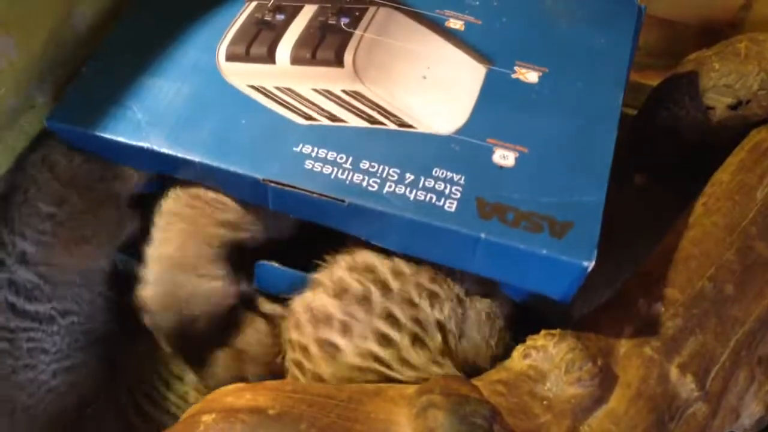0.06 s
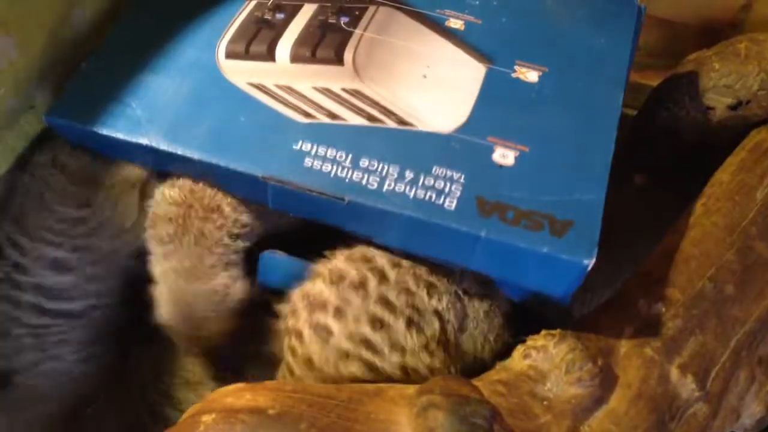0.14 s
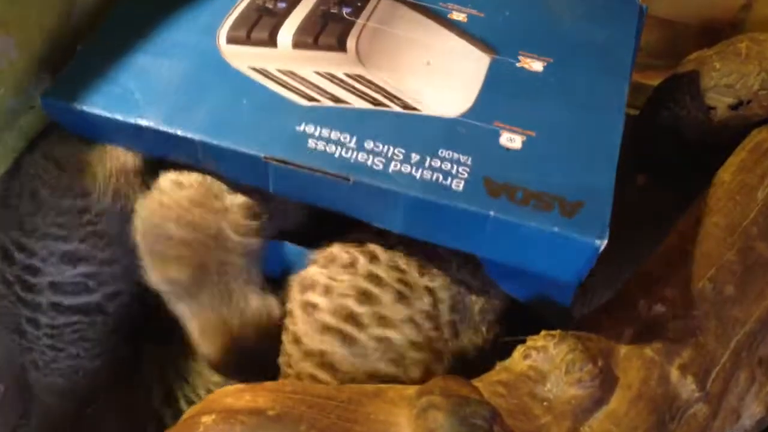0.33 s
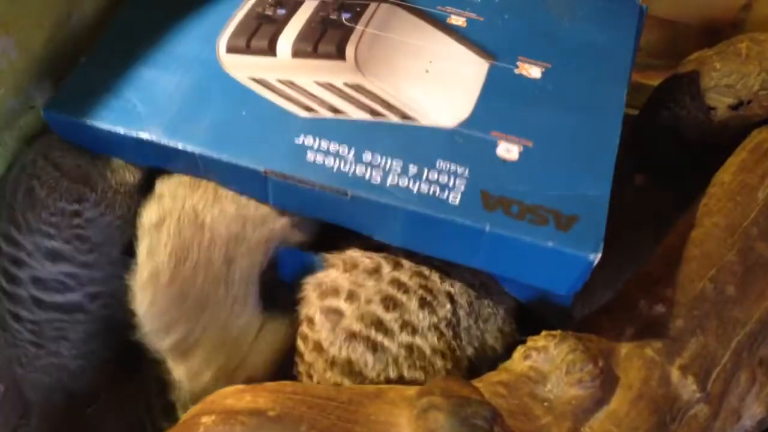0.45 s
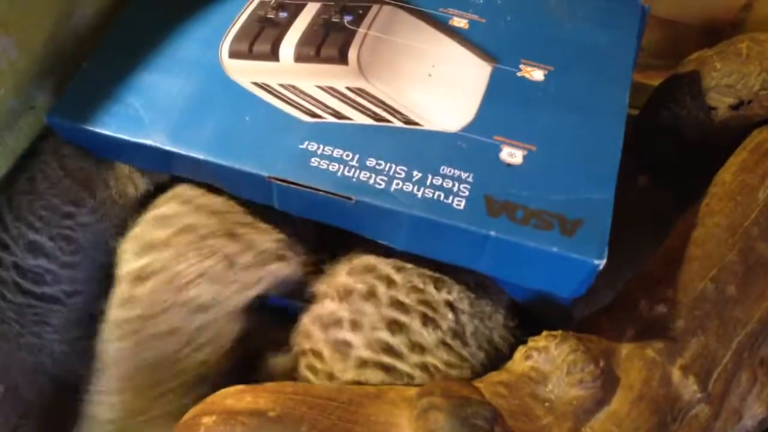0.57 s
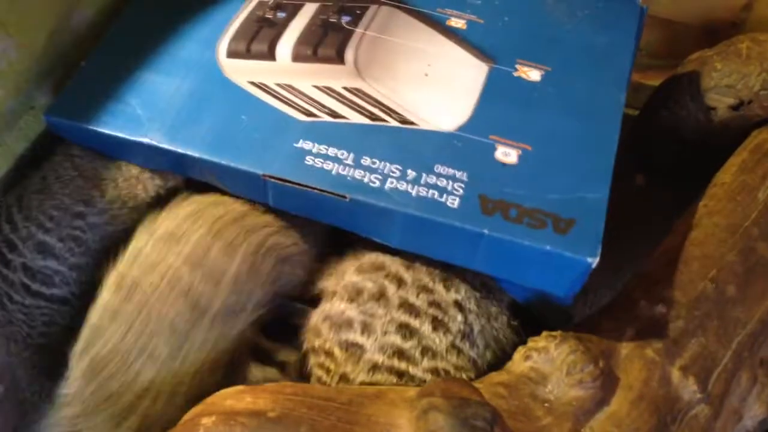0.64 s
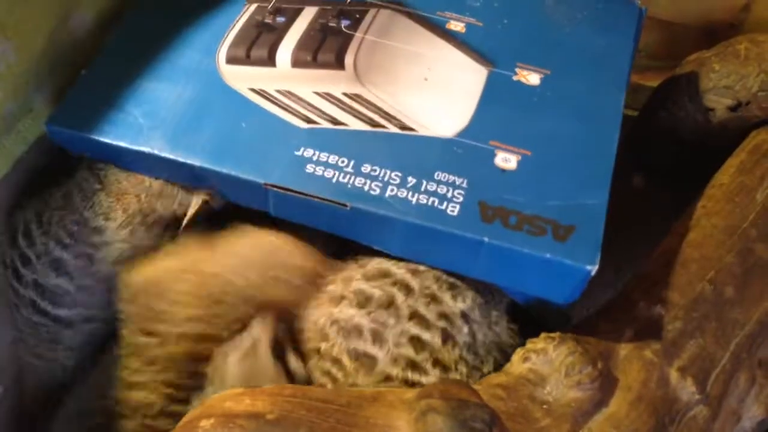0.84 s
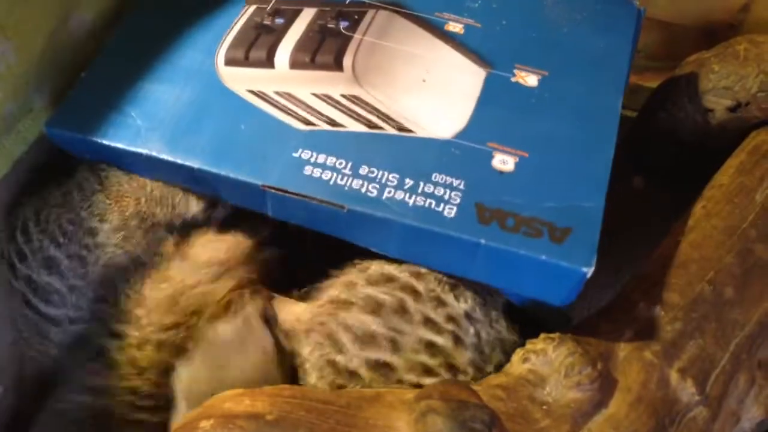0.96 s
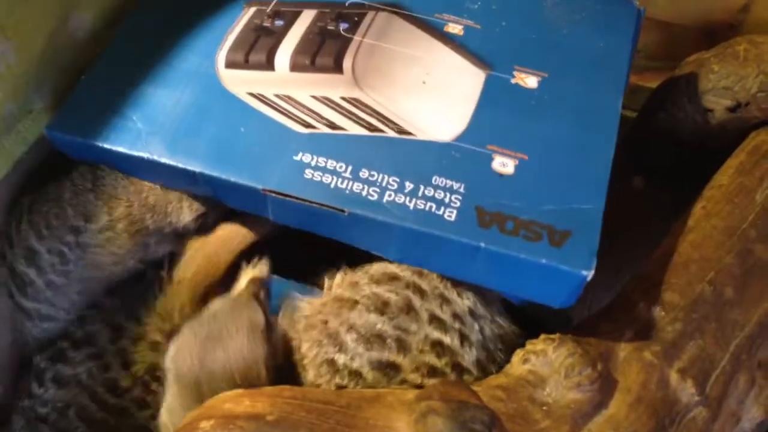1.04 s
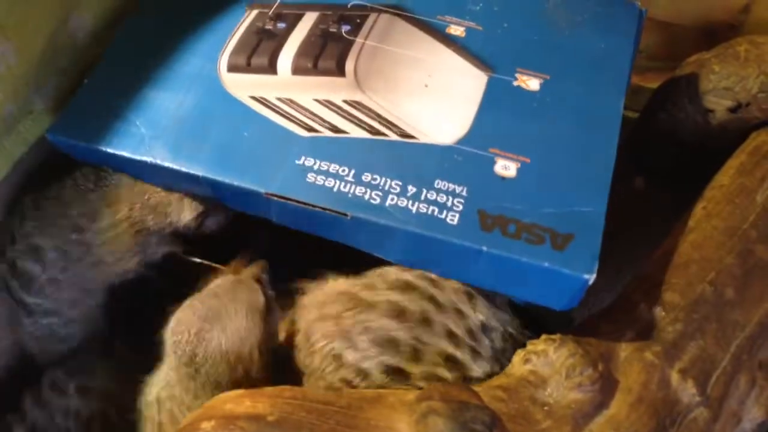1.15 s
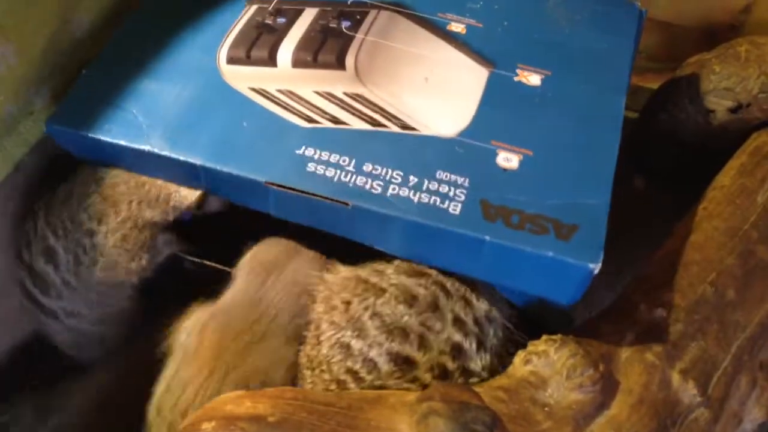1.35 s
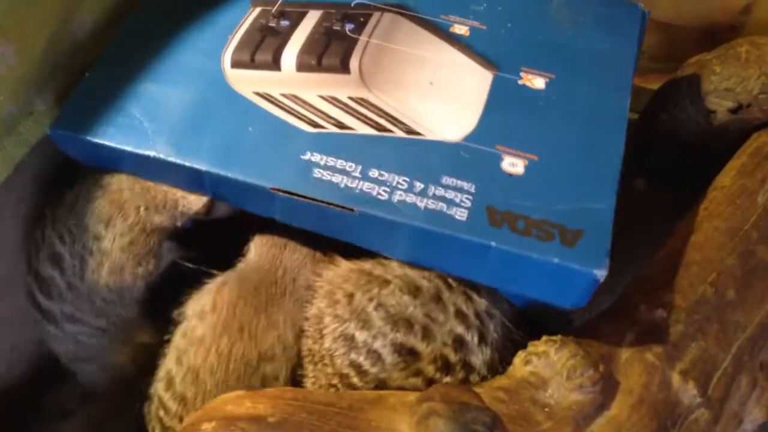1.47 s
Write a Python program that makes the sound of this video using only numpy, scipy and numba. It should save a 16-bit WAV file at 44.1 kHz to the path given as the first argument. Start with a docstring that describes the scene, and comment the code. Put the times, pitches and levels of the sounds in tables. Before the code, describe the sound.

A meerkat chatters in short harsh barks, starting faintly, loudest in a rapid run from about 0.2 to 0.5 seconds, then fading by 0.9, with faint single calls near 1.1 and 1.4. Paws thump a hollow cardboard box from 0.2 seconds, busiest around 1.2, with light claw scrapes and soft shuffling. A small enclosure adds a short echo over a quiet hush.

```python
"""In a small hard enclosure, a meerkat chatters beside a cardboard box. Its short harsh barks,
up to about twelve a second, grow louder and die away: uneven throat pulses and rasp ring its mouth.
Paws thump the hollow box, claws scrape the card, and fur and paws shuffle against it.
The walls add a short echo to the barks and scrapes, over a soft room hush."""
import sys
import numpy as np
from scipy import signal
from scipy.io import wavfile
from scipy.ndimage import uniform_filter1d
from numba import njit

SR = 44100
rng = np.random.default_rng(int(sys.argv[2]) if len(sys.argv) > 2 else 0)


def generate_wav(signal):
    """Clip the signal to [-1, 1] and save it as 16-bit WAV at the path in sys.argv[1]."""
    frames = np.transpose(np.atleast_2d(signal))
    scaled = np.clip(frames, -1, 1) * 32767
    pcm = np.round(scaled).astype(np.int16)
    wavfile.write(sys.argv[1], SR, pcm)


N = 66150

# The barks. Each row: start, swell and hold in seconds; overall, low-ring and teeth gains in dB;
# main and upper mouth resonances in Hz; upper resonance gain in dB; pitch in Hz.
BARK_CALLS = [(.004, 0.011, 0.022, -42, 1, -8.5, 2480, 3600, -17, 415.2),
              (0.158, 0.015, 0.025, -34.5, 0.5, -9, 2400, 3640, -9, 415),
              (0.236, .022, 0.0054, -13, -8.5, -1.5, 2353, 3730, -1, 622.2),
              (.312, 0.011, 0.015, -13.5, -16, 3, 2430, 3494, 1, 625.9),
              (0.387, .018, 0.01, -12, -16, 5, 2605, 3495, -4, 622.2),
              (0.47, .022, 0.0059, -14.5, -12, 3, 2376, 3540, -2.5, 617.5),
              (.570, 0.011, 0.0081, -24.5, -6.5, 1.5, 2411, 3046, 5, 477.7),
              (0.654, .02, 0.017, -37.5, 10, -2.5, 2836, 3270, 1, 405),
              (.746, 0.011, 0.013, -31, 0.5, -25, 2550, 3406, -32, 386.8),
              (0.84, 0.018, 0.016, -41, 2, -29, 1940, 2550, -4.5, 395.5),
              (1.057, 0.005, 0.018, -42, 0.5, -18, 2063, 3560, -13, 646),
              (1.44, 0.0088, 0.011, -39, -10, -18, 1960, 2520, -4.5, 505)]
# Where throat and teeth ring. Each row: centre in Hz, width in Hz, gain in dB.
THROAT_RINGS = [(1460, 410, -36), (1687, 213, -7.5), (2250, 100, -7.5), (3120, 480, -12), (4360, 640, -23)]
TEETH_RINGS = [(5400, 1100, -12.5), (5970, 1310, -7), (6850, 370, -13.5), (7430, 780, -15.5),
               (9200, 2500, -22.5)]
# Low resonances of the barks, including a lingering enclosure ring near 840 Hz.
# Each row: centre in Hz, width in Hz, gain in dB.
LOW_RINGS = [(837, 44, -7), (971, 135, -2), (1065, 530, -4.5)]
# Paws landing. Each row: start in seconds, level in dB, contact time in ms, focus in Hz, cut in dB
# per octave away from that focus (negative boosts), fade time of the scuffle in seconds.
PAW_THUMPS = [(0.21, -12, 3.5, 160, -8, 0.011), (0.29, -32, 6.1, 150, 5, 0.02),
              (0.354, -31, 1.6, 170, 19, .012), (0.369, -21.5, 3.2, 120, -2.5, 0.0099),
              (0.647, -21.5, 3.25, 202, -2, 0.037), (0.774, -24, 1.02, 231, -1, 0.016),
              (.886, -23, 1.38, 190, 2, 0.0054), (.912, -17.5, 0.89, 226, 3, 0.018),
              (0.967, -27.5, 4.2, 147, -5, 0.0059), (0.996, -25, 6.3, 150, -7, 0.007),
              (1.06, -29.5, 0.58, 650, 39, 0.0027), (1.093, -29.5, .8, 620, 32, 0.0047),
              (1.116, -22, 0.81, 400, 10, 0.03), (1.174, -21, 1.2, 200, -3, 0.006),
              (1.187, -8, 0.85, 238, 3, 0.011), (1.211, -16, 0.77, 445, 13, 0.021),
              (1.327, -17, 0.45, 297.5, -5.5, .008), (1.347, -20, 0.71, 416, 20, 0.011),
              (1.420, -34.5, 0.62, 620, 31, 0.0035), (1.454, -18, 0.84, 462.5, -1.5, 0.014),
              (1.472, -25, 3, 120, 25, 0.0067)]
# The box's own tones. Each row: frequency in Hz, gain in dB, seconds to fade by 60 dB.
BOX_TONES = [(107.6, -12.5, 0.27), (146, -10, 0.13), (197.3, -2.5, 0.16), (218.5, -0.5, 0.157),
             (286, -8.5, 0.065), (382, -3.5, 0.099), (440, -2, 0.076), (519, -0.5, 0.04),
             (603.4, -5.5, 0.094), (690, -0.5, 0.026), (848, -8.5, 0.052), (995, -5, 0.036),
             (1330, -2.5, 0.029), (1900, -45, 0.021)]
# Claws on card. Each row: start in seconds, length in seconds, level in dB, centre in Hz.
CLAW_SCRAPES = [(0.303, 0.0071, -34, 13000), (0.724, 0.0089, -45.5, 7000), (0.79, 0.041, -51, 10700),
                (.866, 0.0081, -54, 5870), (0.954, 0.029, -52, 8500), (1.113, 0.0071, -49, 6000),
                (1.179, 0.091, -44.5, 6440), (1.179, 0.031, -34, 2030), (1.189, 0.032, -43, 1210),
                (1.222, 0.027, -39, 9000), (1.232, 0.0089, -30.5, 6500), (1.449, 0.0064, -28, 8900),
                (1.451, 0.031, -40, 3340)]
# How strongly fur and paws rub the card. Each row: time in seconds, gain in dB.
SHUFFLE_CURVE = [(0, -41.5), (.07, -57.5), (.15, -50.5), (.3, -39), (.55, -46), (.63, -48), (.72, -43.5),
                 (.84, -46), (.93, -46.5), (.96, -64), (1.05, -68), (1.13, -53), (1.239, -40), (1.29, -84),
                 (1.4, -50), (1.458, -48)]
# The tone colour of the room hush. Each row: frequency in Hz, relative level in dB.
HUSH_COLOUR = [(15, -35), (25, 13), (246, 0), (495, 1), (945, -62), (1800, 1), (2120, -20.5), (2850, -17),
               (3530, -17), (15500, -22.5)]

PITCH_JITTER, PULSE_SCATTER_DB, RASP_DB, RELEASE_S = .035, 2.5, -1, .0056
MAIN_WIDTH_HZ, UPPER_WIDTH_HZ = 220, 420
TONE_SCATTER_DB, PHASE_SCATTER_RAD, SCUFFLE_DB = 2, .4, -23
ECHO_DB, ECHO_SPLIT_HZ, ECHO_RISE_S = -11, 1800, .0044
LOW_FADE_S, HIGH_FADE_S = .32, .11  # time for the echo to fall by 60 dB


def meerkat(t):
    """Pulses and rasp swell and fade with each bark, ringing mouth, throat, teeth and low resonances."""
    barks = np.array(BARK_CALLS)
    start, swell, hold = barks[:, :3].T[:, :, None]
    current = np.clip(np.searchsorted(barks[:, 0], t) - 1, 0, None)
    low_db, teeth_db, main_hz, upper_hz, upper_db, pitch_hz = barks[current, 4:].T
    source = throat_pulses(pitch_hz) + undb(RASP_DB) * rng.standard_normal(N)
    age = t - start
    rise = np.clip(age / swell, 0, 1) ** 2
    fall = np.exp(-np.maximum(age - swell - hold, 0) / RELEASE_S)
    loudness = undb(barks[:, 3]) @ (rise * fall)
    voice = source * loudness + 1e-18
    main = resonate(voice, [(main_hz, MAIN_WIDTH_HZ, 0)])
    upper = resonate(voice * undb(upper_db), [(upper_hz, UPPER_WIDTH_HZ, 0)])
    throat = resonate(voice, THROAT_RINGS)
    low = resonate(voice * undb(low_db), LOW_RINGS)
    teeth = resonate(voice * undb(teeth_db), TEETH_RINGS)
    return undb(-4.5) * (main - upper + throat + low + teeth)


def throat_pulses(pitch_hz):
    """The throat gives one pulse a cycle, uneven in timing and strength."""
    step = pitch_hz * (1 + PITCH_JITTER * wander(500)) / SR
    cycles = np.cumsum(step)
    at = np.flatnonzero(np.diff(np.floor(cycles[:-1]))) + 1
    share = cycles[at] % 1 / step[at]  # each pulse is split between two samples
    size = undb(PULSE_SCATTER_DB * rng.standard_normal(N)[at])
    pulses = np.zeros(N)
    pulses[at], pulses[at + 1] = size * share, size * (1 - share)
    return level(pulses, 0)


def resonate(voice, rings):
    """Each resonance picks out one band of the voice; the bands add with alternating signs."""
    return sum((-1) ** k * undb(db) * bandpass(band(voice, hz, width), hz + np.zeros(N), 2. * width)
               for k, (hz, width, db) in enumerate(rings))


def box_thumps():
    """A paw pushes the card, then scuffles; where it lands decides which box tones ring most."""
    out = np.zeros(N + SR)
    scatters = rng.standard_normal((len(PAW_THUMPS), len(BOX_TONES), 2))
    age = np.arange(SR // 3) / SR
    for (start, db, contact_ms, focus_hz, cut_db, scuffle_s), scatter in zip(PAW_THUMPS, scatters):
        ring = 0
        for (hz, tone_db, fade_s), (gain_draw, phase_draw) in zip(BOX_TONES, scatter):
            gain = undb(tone_db + TONE_SCATTER_DB * gain_draw - cut_db * abs(np.log2(hz / focus_hz)))
            tone = np.sin(2 * np.pi * hz * age + PHASE_SCATTER_RAD * phase_draw)
            ring += gain * tone * fade(age, fade_s)
        grit = rng.standard_normal(SR // 10) * undb(1.5 * rng.exponential(size=SR // 10))
        contacts = level(grit, SCUFFLE_DB) * np.exp(-age[:SR // 10] / scuffle_s)
        contacts[0] = 1  # the landing itself
        push = np.sin(np.pi * np.clip(age[:SR // 100] / contact_ms * 1000, 0, 1)) ** 2
        blow = np.convolve(ring, push)
        thump = signal.fftconvolve(blow / np.abs(blow).max(), contacts)
        at = int(start * SR)
        out[at:at + len(thump)] += undb(db) * thump
    return out[:N]


def claw_scrapes(t):
    """Claws drag over the card with uneven pressure, making a wide band of gritty noise."""
    out = 0
    for start, length, db, hz in CLAW_SCRAPES:
        rise = np.clip((t - start) / .003, 0, 1)
        fall = np.exp(-np.maximum(t - start, 0) ** 4 / length ** 4)
        grit = rng.standard_normal(N) * undb(1.5 * rng.exponential(size=N) + 2 * wander(150))
        out += undb(db) * rise * fall * band(level(grit, 0), hz, width_hz=1.33 * hz)
    return out


def fur_shuffle(t):
    """Fur and paws rub the card with a soft, grainy sound."""
    times, db = np.array(SHUFFLE_CURVE).T
    grit = rng.standard_normal(N) * undb(3 * wander(60))
    return undb(np.interp(t, times, db)) * band(grit, hz=650, width_hz=970)


def wall_echo(sound):
    """Close, hard walls scatter many quick echoes; the treble dies sooner."""
    age = np.arange(SR // 2) / SR
    noise = rng.standard_normal(len(age))
    low = signal.sosfilt(signal.butter(1, ECHO_SPLIT_HZ, fs=SR, output="sos"), noise)
    echoes = low * fade(age, LOW_FADE_S) + (noise - low) * fade(age, HIGH_FADE_S)
    echoes *= np.clip(age / ECHO_RISE_S, 0, 1)
    return undb(ECHO_DB) * signal.fftconvolve(sound, echoes / np.sqrt(np.sum(echoes ** 2)))[:N]


def room_hush():
    """Half-octave bands of room noise swell together, and each flickers on its own."""
    out, swell_db = 0, wander(3.3)
    colour_hz, colour_db = np.array(HUSH_COLOUR).T
    for hz in 30 * 2 ** np.arange(0, 9.1, .5):
        flicker_db = 1.2 * wander(12.2)
        db = np.interp(np.log(hz), np.log(colour_hz), colour_db) + swell_db + flicker_db
        centre = np.full(N, hz)
        noise = bandpass(rng.standard_normal(N), centre, hz / 2)
        out += undb(db) * bandpass(noise, centre, hz / 2)
    return level(out, db=-48)


def undb(db):
    """Turn decibels into a gain."""
    return 10 ** (np.asarray(db) / 20)


def level(x, db):
    """Set a sound's average (RMS) level."""
    return x * undb(db) / np.sqrt(np.mean(x ** 2))


def fade(age, seconds):
    """Fall by 60 dB in the given time."""
    return np.exp(-np.log(1000) * age / seconds)


def wander(rate):
    """A smooth random curve, spread about 1, with `rate` new values a second."""
    span = int(SR / rate)
    steps = np.repeat(rng.standard_normal(N // span + 1), span)
    return 1.3 * uniform_filter1d(uniform_filter1d(steps, span), span)[:N]


@njit
def bandpass(x, hz, width_hz):
    """Let one band through, with gain 1 at a centre that may move."""
    out, mid, low = np.empty(len(x)), 0., 0.
    for i in range(len(x)):
        tuning, damping = np.tan(np.pi * hz[i] / SR), width_hz / hz[i]
        swing = (mid + tuning * (x[i] - low)) / (1 + tuning * (tuning + damping))
        mid, low = 2 * swing - mid, low + 2 * tuning * swing
        out[i] = damping * swing
    return out


def band(x, hz, width_hz):
    """Let one band through, boosted so white noise roughly keeps its level."""
    return bandpass(x, hz + np.zeros(N), 1. * width_hz) * np.sqrt(SR / np.pi / width_hz)


def scene():
    """Mix barks, scrapes and their echo with the thumps, shuffle and hush, in one channel."""
    t = np.arange(N) / SR
    near = meerkat(t) + claw_scrapes(t)
    return (near + wall_echo(near) + box_thumps() + fur_shuffle(t) + room_hush())[None]


def record(dry):
    """The microphone loses the deep bass, rounds the loudest peaks and cuts the highest treble."""
    bass_cut = signal.butter(4, 88, "high", fs=SR, output="sos")
    treble_cut = signal.ellip(14, .3, 90, 15730, fs=SR, output="sos")
    rounded = np.tanh(1.15 * signal.sosfilt(bass_cut, dry)) / 1.15
    return signal.sosfilt(treble_cut, rounded)


dry = scene()
out = record(dry)
generate_wav(out)
```